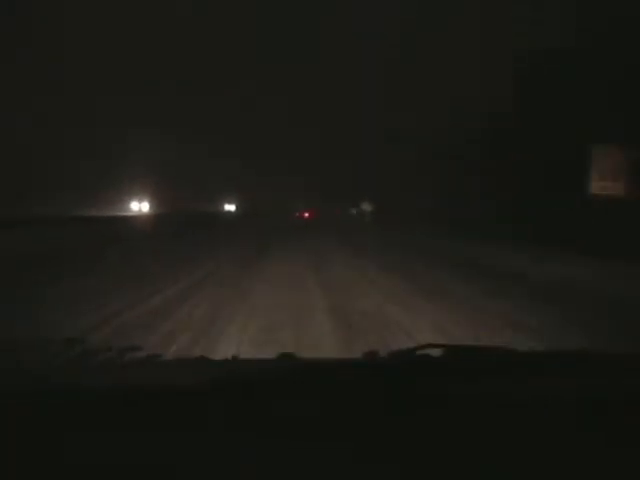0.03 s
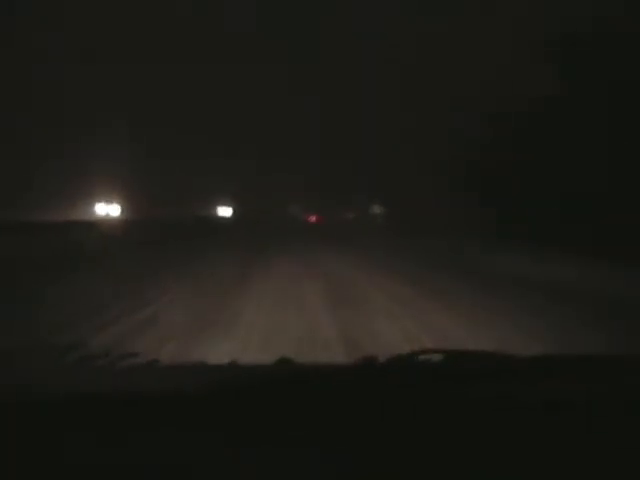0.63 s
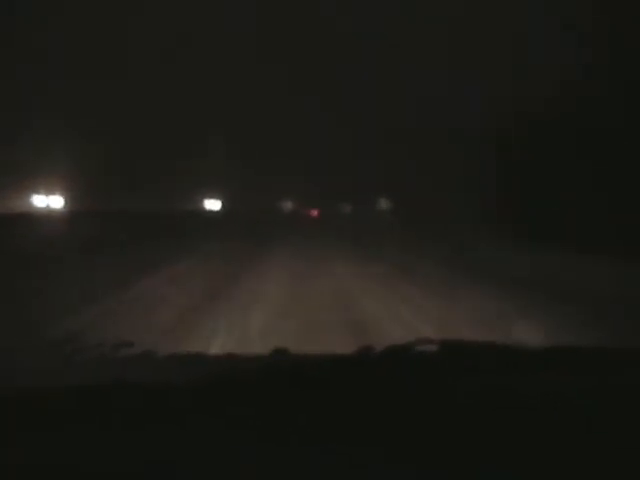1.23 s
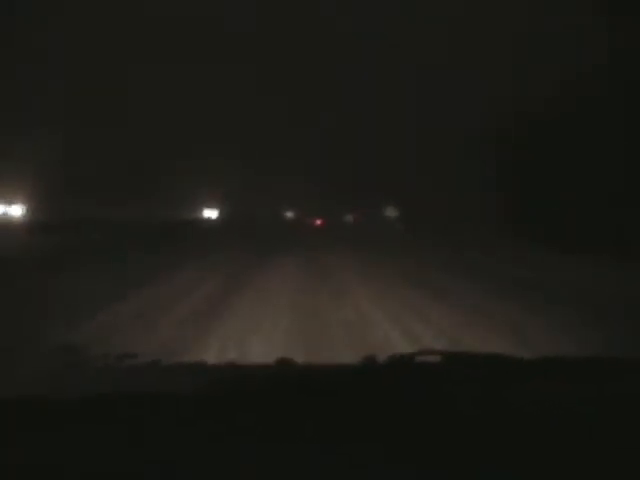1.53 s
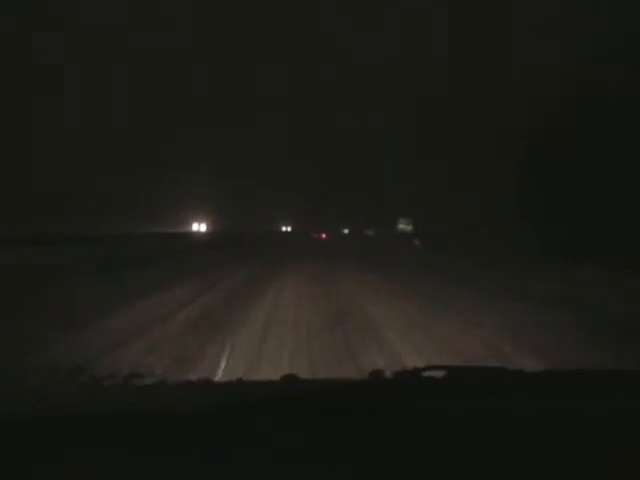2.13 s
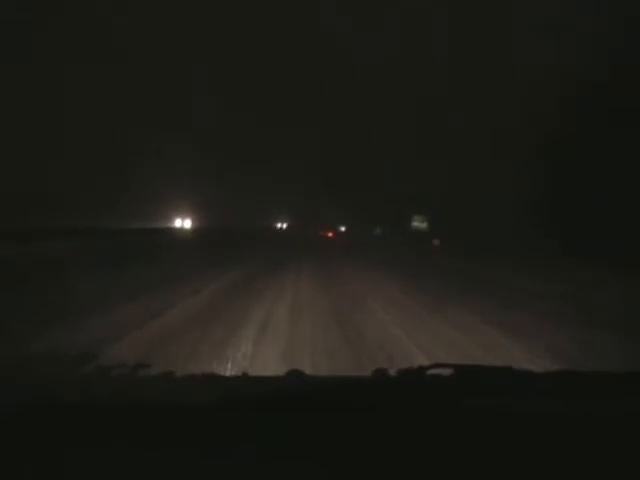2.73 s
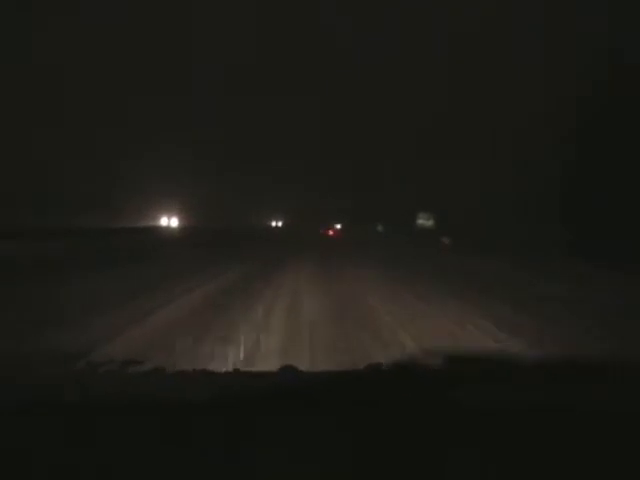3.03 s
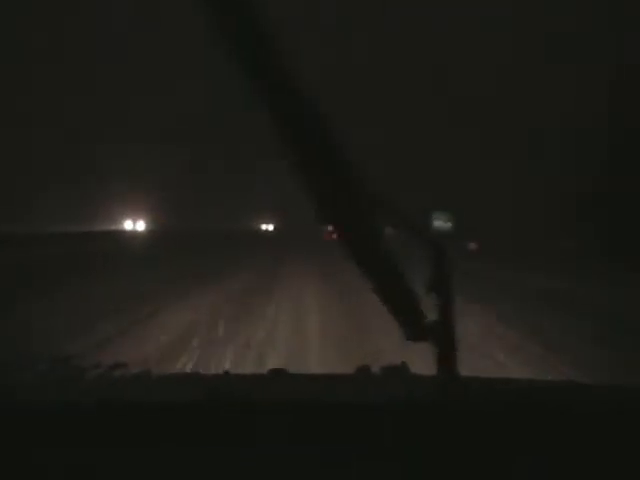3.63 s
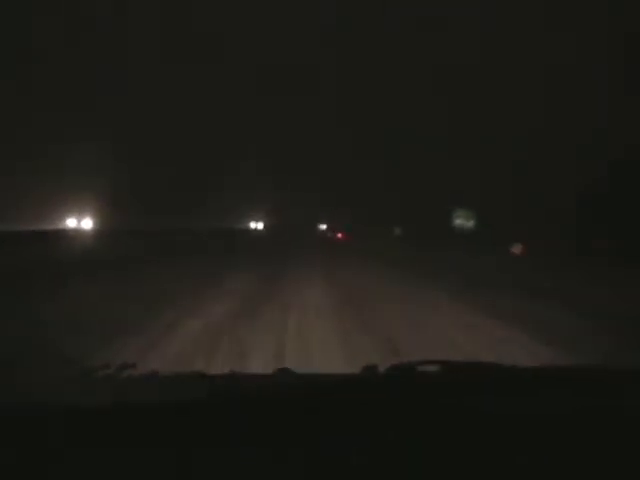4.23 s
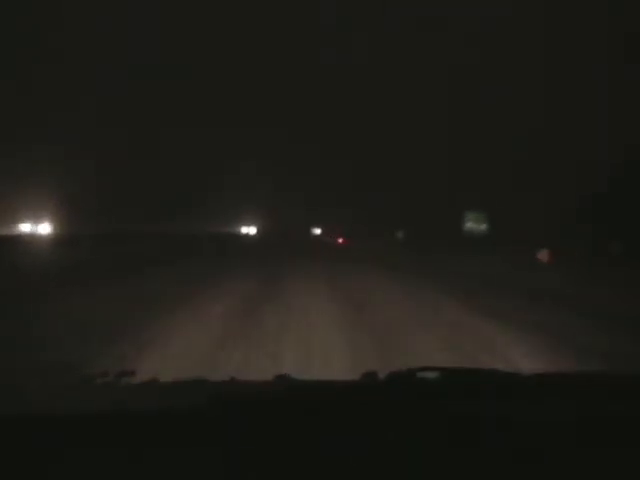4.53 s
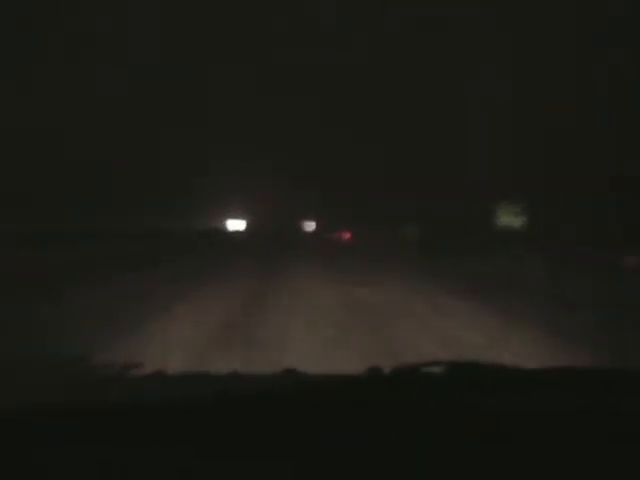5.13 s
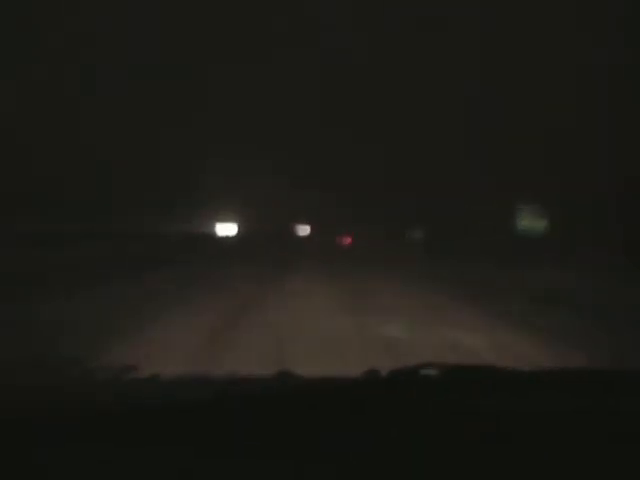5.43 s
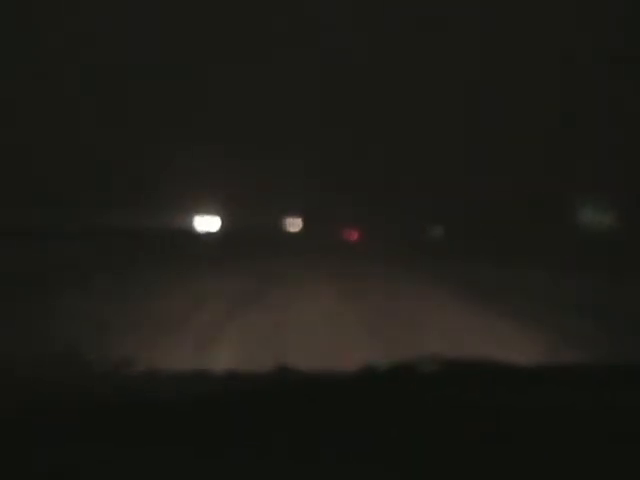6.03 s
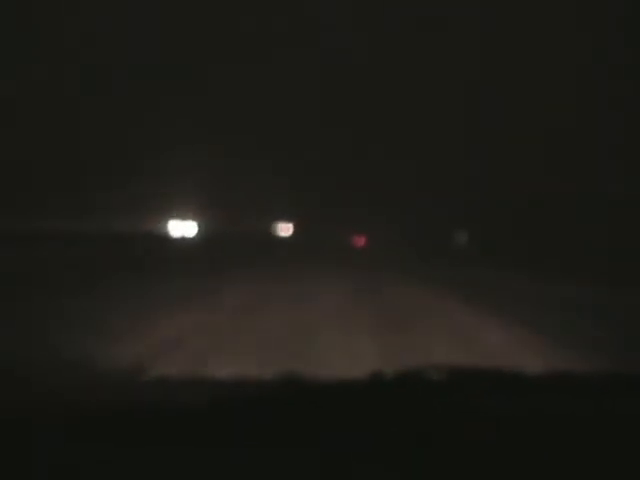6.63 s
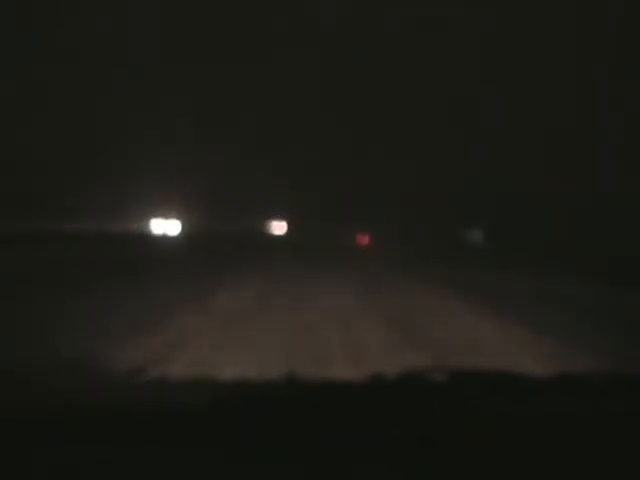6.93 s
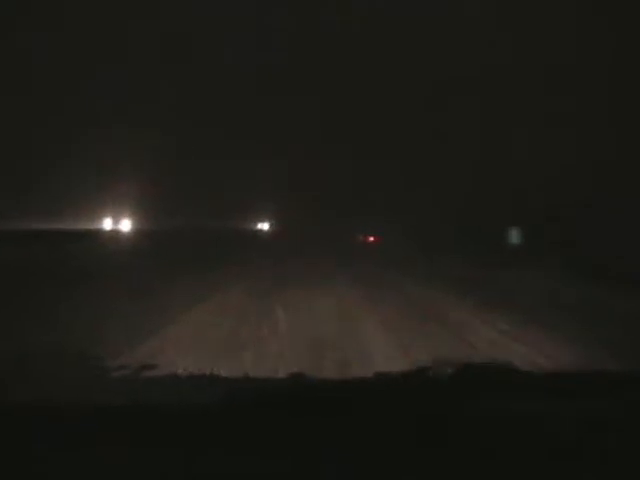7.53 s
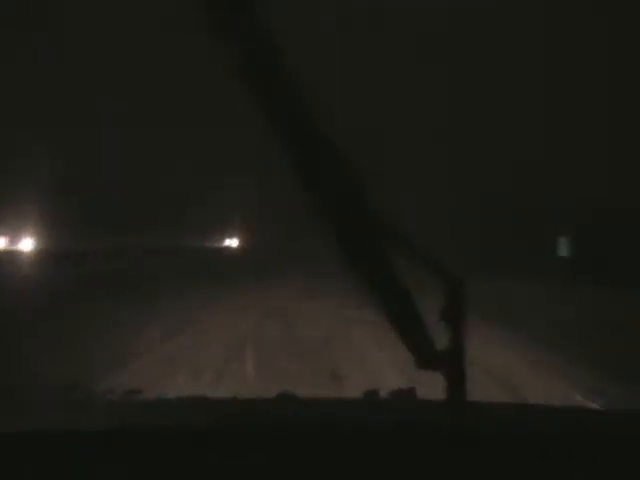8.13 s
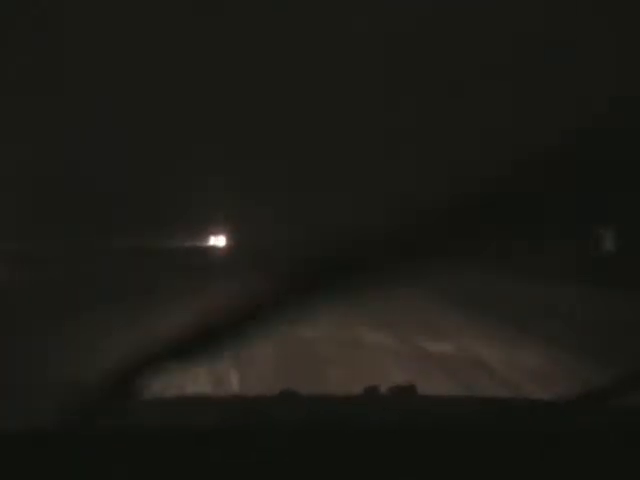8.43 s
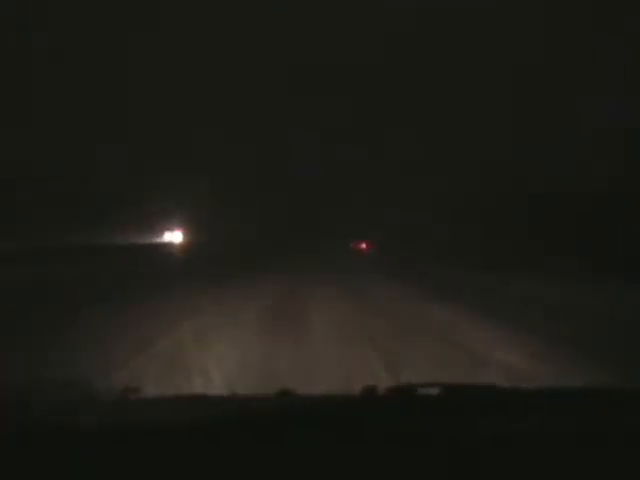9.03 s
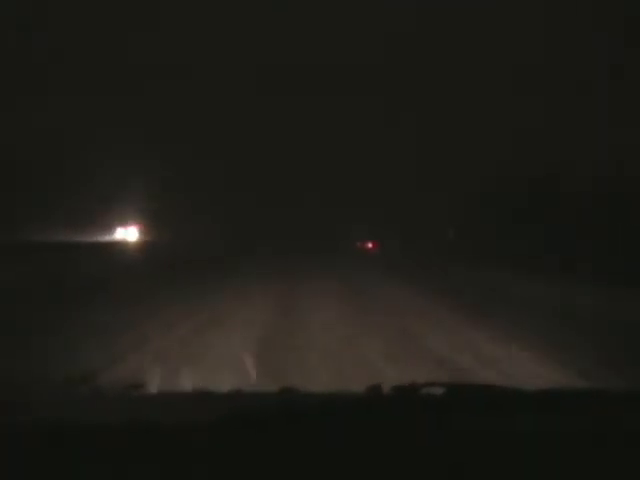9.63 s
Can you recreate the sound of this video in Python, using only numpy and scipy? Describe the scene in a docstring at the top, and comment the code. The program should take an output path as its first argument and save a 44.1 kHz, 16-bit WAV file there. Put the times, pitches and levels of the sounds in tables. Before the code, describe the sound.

Heard from within the closed cabin, a car rumbles steadily through light rain, its tyres humming and hissing and small bumps thudding through the body. Twice, about four and a half seconds apart, the windshield wipers sweep up and back. Each wipe opens with a short rubber chirp, continues with a wet swish, rasps, ticks and tiny squeaks, and ends with a knock as the arms land.

```python
"""A car rumbles through light rain at night, heard from inside, with droning tyres and hissing air.
Bumps shake the body, and spray ticks on the car now and then. Twice the wipers sweep up and back.
Their rubber chirps as it breaks loose, swishes over the wet glass, and scrapes, groans and squeaks
where it drags. At the end of each wipe the arms knock down into their rest."""
import sys
import numpy as np
from scipy import signal
from scipy.fft import rfft, irfft, next_fast_len
from scipy.io import wavfile
from scipy.ndimage import uniform_filter1d

SR = 44100
rng = np.random.default_rng(int(sys.argv[2]) if len(sys.argv) > 2 else 0)


def store_wav(level_fs):
    """Save 16-bit WAV to argv[1]."""
    pcm = np.round(np.clip(np.atleast_2d(level_fs), -1, 1) * 32767)
    wavfile.write(sys.argv[1], SR, pcm.T.astype(np.int16))


N = 431738
TIME = np.arange(N) / SR
PADDED = next_fast_len(N + 8192, True)
BIN_HZ = np.maximum(np.arange(PADDED // 2 + 1) * SR / PADDED, 1)


def from_db(db):
    """Turn decibels into a number to multiply by."""
    return 10 ** (np.asarray(db) / 20)


def rms_one(x):
    """Scale a signal so that its average power is 1."""
    return x / np.sqrt(np.mean(x ** 2) + 1e-20)


def over_time(points):
    """Join a table's points with straight lines, giving a value for every sample."""
    return np.interp(TIME, *np.transpose(points))


def over_hz(points):
    """Join a table's points along a pitch scale, giving a value for every frequency."""
    hz, value = np.transpose(points)
    return np.interp(np.log(BIN_HZ), np.log(hz), value)


def filtered(x, gain):
    """Turn each frequency up or down by its own gain."""
    return irfft(rfft(x, PADDED) * gain, PADDED)[..., :N]


def resonance(x, hz, width_hz):
    """Let through a band around one pitch, as a ringing object does."""
    decay, turn = np.exp(-np.pi * width_hz / SR), 2 * np.pi * hz / SR
    feedback = [1, -2 * decay * np.cos(turn), decay ** 2]
    return signal.lfilter((1 - decay ** 2) / 2 * np.array([1, 0, -1]), feedback, x + 1e-18)


def noise_pair():
    """Two unrelated smooth noises."""
    return rng.standard_normal((2, N))


def crackle(per_s, spread_db):
    """Two streams of tiny random clicks of uneven size, like droplets or slipping rubber."""
    sizes = from_db(spread_db * np.minimum(rng.exponential(1, N), 4))
    return rms_one((rng.random(N) < per_s / SR) * sizes * noise_pair())


def drift(per_s):
    """A random wander, typically 1 away from zero."""
    points = rng.standard_normal(int(N / SR * per_s) + 2)
    return rms_one(np.interp(TIME * per_s, np.arange(len(points)), points))


def swells(rows):
    """A loudness curve with one bell-shaped rise and fall for each row."""
    power = np.zeros(N)
    for s, half, db in rows:
        near = slice(max(int((s - 4 * half) * SR), 0), int((s + 6 * half) * SR))
        power[near] += from_db(db) ** 2 / np.cosh(2 * (TIME[near] - s) / half)
    return np.sqrt(power)


def ring(hits, tones, scatter_db=1):
    """Every hit sets all of an object's tones ringing, each with a slightly random strength."""
    at = [round(s * SR) for s, _ in hits]
    hit_db = np.array(hits)[:, 1]
    out = np.zeros(N)
    for k, (hz, tone_db, fade_s) in enumerate(tones):
        clicks = np.full(N, 1e-18)
        clicks[at] = from_db(hit_db + tone_db + scatter_db * rng.standard_normal(len(at)))
        decay, turn = from_db(-60 / (fade_s * SR)), 2 * np.pi * hz / SR
        feedback = [1, -2 * decay * np.cos(turn), decay ** 2]
        out += (-1) ** k * signal.lfilter([0, np.sin(turn)], feedback, clicks)
    return out


def reflected(x, echo_db, fade_s, lag_s=0):
    """A sound, lag_s later at the right ear, plus its quick echoes off glass and trim."""
    t = TIME[:SR // 8]
    echoes = rng.standard_normal((2, len(t))) * from_db(-60 * t / fade_s) * (t > .002)
    echoes /= np.sqrt(np.sum(echoes ** 2, axis=1, keepdims=True))
    direct = np.array([x, np.interp(TIME - lag_s, TIME, x)])
    return direct + from_db(echo_db) * signal.oaconvolve(x[None], echoes, axes=1)[:, :N]


# pitches that the cabin boosts or swallows: (frequency [Hz], width [Hz], boost [dB])
CABIN_BANDS = [(142.6, 13, 3.5), (214, 9.5, 0), (276, 18, 1.5), (379, 7.3, 1.5), (638, 28, 3.5),
               (790, 25, -2), (877, 115, 3.5), (1570, 76, -5), (1830, 64, 1.5), (2007, 120, -3),
               (2270, 120, 1), (2860, 40, -8.5)]
CABIN_DB = sum(db * np.exp(-((BIN_HZ - hz) / width) ** 2) for hz, width, db in CABIN_BANDS)
# how alike left and right sound: (frequency [Hz], likeness [0-1])
EAR_LIKENESS = [(130, .997), (290, .975), (640, .91), (1400, .78), (3100, .6), (6800, .18), (15000, .02)]

def in_cabin(pair, colour):
    """Give two noises a tone colour and the cabin's ring; the ears share the bass but not the treble."""
    gain = rms_one(from_db(over_hz(colour) + CABIN_DB))
    alike = over_hz(EAR_LIKENESS)
    shared = filtered(pair[0], gain)
    apart = filtered(pair[1], gain * np.sqrt((1 - alike) / (1 + alike)))
    return np.array([shared + apart, shared - apart])


# how strongly the road shakes the car: (time [s], level [dB])
ROAD_ROUGHNESS = [(0, -23.5), (0.7, -27.5), (1.0, -28.5), (1.35, -26.5), (2.25, -35), (3.15, -26.5),
                  (3.3, -22.5), (3.48, -29.5), (3.85, -30), (4.4, -32), (6.4, -30), (8.5, -30.5),
                  (9.79, -26)]
# tone colour of the rumble: (frequency [Hz], level [dB])
RUMBLE_COLOUR = [(12, -30), (22, -24), (32, -8.5), (52, 0.5), (80, -1.5), (105, -2), (200, -21), (800, -78)]

def road_rumble():
    """The rough road shakes the car's body into a deep noise."""
    return from_db(over_time(ROAD_ROUGHNESS)) * in_cabin(noise_pair(), RUMBLE_COLOUR)


# tone colour of the drone: (frequency [Hz], level [dB])
DRONE_COLOUR = [(20, -40), (70, -14), (110, 0), (145, -1), (190, -8), (310, -12.5), (540, -14.5),
                (740, -23), (1000, -24.5), (1450, -28.5), (2600, -33.5), (3400, -46.5), (8000, -70)]

def tyre_drone(average_db=-22.6, follow_share=0.13):
    """The rolling tyres drone, a little louder where the road is rougher."""
    road_db = over_time(ROAD_ROUGHNESS)
    drone_db = average_db + follow_share * (road_db - road_db.mean())
    return from_db(drone_db) * in_cabin(noise_pair(), DRONE_COLOUR)


# hiss as the road gets wetter or drier: (time [s], level [dB])
ROAD_WETNESS = [(0, -43.5), (2.0, -44), (2.9, -42.5), (4.7, -45), (6.1, -43.5), (7.5, -44), (9.2, -42),
                (9.79, -46)]
# tone colour of the hiss: (frequency [Hz], level [dB])
HISS_COLOUR = [(100, -22), (1500, 7), (3500, 0), (5000, -3), (7500, -7.5), (11000, -10), (14000, -14),
               (16000, -28)]

def hiss(flutter_db=0.9):
    """Rushing air and tyres on the wet road make a slightly fluttering hiss."""
    hiss_db = over_time(ROAD_WETNESS) + flutter_db * drift(per_s=25)
    return from_db(hiss_db) * in_cabin(noise_pair(), HISS_COLOUR)


# hum as the road surface changes: (time [s], level [dB])
HUM_LOUDNESS = [(0, -32.5), (1.2, -37.5), (2.3, -43.5), (3.4, -33), (4.4, -32), (5.7, -29), (6.7, -35.5),
                (8.2, -30), (9.0, -35), (9.79, -30)]
# tones of the hum: (pitch [Hz], width [Hz], relative level [dB])
HUM_TONES = [(136.3, 11.3, -2.5), (215.1, 19.6, -6.5), (271.7, 18.3, -5)]

def tyre_hum():
    """The tyres hum a few wavering tones that swell and fade with the road surface."""
    tread = rng.standard_normal(N)
    tones = np.zeros(N)
    for hz, width, db in HUM_TONES:
        tone = resonance(resonance(tread, hz, width), hz, width)
        tones += from_db(db) * rms_one(tone)
    return from_db(over_time(HUM_LOUDNESS)) * tones


# bumps in the road: (time [s], level [dB])
ROAD_BUMPS = [(0.075, -15.5), (.365, -15), (0.706, -12.5), (1.08, -16), (1.215, -15.5), (1.383, -18),
              (1.716, -16), (2.822, -11), (3.125, -10.5), (3.285, -16), (6.915, -15.5), (9.55, -17)]
# tones of the car's body: (pitch [Hz], relative level [dB], time to fade by 60 dB [s])
BODY_TONES = [(45, -7, 0.059), (136.7, 1, 0.18), (255, -6.5, 0.032)]

def bumps():
    """Each bump makes the car's body ring with a low thud."""
    return ring(ROAD_BUMPS, BODY_TONES)


# spray hitting the car: (time [s], half length [s], level [dB])
SPRAY_HITS = [(.555, .009, -43), (.622, .011, -39), (1.575, .003, -47), (7.118, .003, -39.5)]
# tone colour of the spray: (frequency [Hz], level [dB])
SPRAY_TONE_COLOUR = [(1200, -18), (2500, 4), (3600, -1), (5500, -1), (8000, -12), (11000, -7), (15000, -20)]

def spray():
    """Small bunches of droplets tick on the car."""
    return in_cabin(swells(SPRAY_HITS) * crackle(per_s=4600, spread_db=1.5), SPRAY_TONE_COLOUR)


# tone colour of a tick, from a drop or from rubber: (frequency [Hz], level [dB])
TICK_COLOUR = [(400, -14), (1500, 0), (3000, 0), (7000, -4), (12000, -9), (16000, -22)]

def ticks(rows, rise_s=.003, fade_s=.038, sharpness=8, ring_db=13):
    """Sudden bursts of crackle, each ringing at its own pitch and dying quickly."""
    grains = in_cabin(crackle(per_s=7000, spread_db=2), TICK_COLOUR)
    t = TIME[:int(fade_s * SR)]
    loudness = np.minimum(t / rise_s, 1) * from_db(-60 * np.maximum(t - rise_s, 0) / fade_s)
    out = np.zeros((2, N))
    for s, db, hz in rows:
        near = slice(int(s * SR), int(s * SR) + len(t))
        burst = grains[:, near] + from_db(ring_db) * resonance(grains[:, near], hz, hz / sharpness)
        burst = signal.lfilter(*signal.butter(2, 2.2 * hz, fs=SR), burst)   # lower ticks are duller
        out[:, near] += from_db(db) * loudness * rms_one(burst)
    return out


# a raindrop landing: (time [s], level [dB], pitch [Hz])
HEAVY_DROP = [(.651, -34, 3600)]

def raindrop():
    """One heavy drop ticks on the windscreen."""
    return ticks(HEAVY_DROP)


# when each wipe begins: (time [s])
WIPE_STARTS = [3.1, 7.598]
# spots where the rubber drags, flips over for the return, or judders as the arms slow down:
# (time into wipe [s], half length [s], shudder [dB], first wipe's rasp [dB], second's [dB], pitch [Hz])
DRAG_SPOTS = [ (0.057, 0.034, -31, -45, -43, 2030), (0.152, 0.0036, -33, -27, -34, 4500),
              (0.219, 0.012, -27, -33.5, -34, 3600), (0.253, 0.008, -28, -46, -38, 1500),
              (0.387, 0.005, -30.5, -38, -46, 1750), (0.505, 0.022, -32, -35.5, -34, 3540),
              (0.56, 0.018, -29, -44, -47, 2100), (0.683, 0.005, -31.5, -34, -38, 2220),
              (0.703, 0.013, -32, -33, -31.5, 2540), (0.731, 0.0057, -27, -39, -37, 3000),
              (0.817, 0.019, -28.5, -49, -45, 2300), (0.863, 0.014, -32, -33, -30, 3780),
              (.927, 0.0041, -50, -36, -32, 3000), (1.004, 0.011, -30, -35, -33, 4240),
              (1.051, 0.028, -32.5, -35.5, -38, 3440), (1.127, 0.0036, -32, -35, -35, 2900),
              (1.145, 0.0043, -25, -40, -32.5, 2560), (1.19, 0.0087, -29, -34.5, -31, 2300)]
# tone colour of the shaking arm: (frequency [Hz], level [dB])
SHUDDER_COLOUR = [(60, -56), (140, -2), (300, 4.5), (620, 2), (900, -9.5), (1250, -8.5), (1600, -13.5),
                  (3000, -17.5), (8000, -62)]

def arm_shudder(boost_db=4.5):
    """Slipping rubber shakes the wiper arm at the same spots in both wipes."""
    shakes = [(start + after, half, db) for start in WIPE_STARTS for after, half, db, *_ in DRAG_SPOTS]
    shaking = swells(shakes) * crackle(per_s=5400, spread_db=1.5)
    return from_db(boost_db) * in_cabin(shaking, SHUDDER_COLOUR)


# tone colour of the scraping rubber: (frequency [Hz], level [dB])
RASP_COLOUR = [(200, -22), (900, -17), (1500, 8.5), (2400, 5), (3700, -1), (5500, -3.5), (7500, -8.5),
               (10000, -15), (15000, -25)]

def rubber_rasp(chatter_db=0.5, boost_db=2):
    """At each drag spot the rubber edge grips unevenly, and its many tiny slips make it ring."""
    friction = rms_one(crackle(per_s=5000, spread_db=2) * from_db(chatter_db * drift(per_s=220)))
    rasp = np.zeros((2, N))
    for wipe, start in enumerate(WIPE_STARTS):
        for after, half, _, *rasp_db, edge_hz in DRAG_SPOTS:
            s = start + after
            near = slice(int((s - 4 * half) * SR), int((s + 6 * half) * SR))
            offset = (TIME[near] - s) / half
            # the edge bites suddenly and lets go gradually
            grip = np.where(offset < 0, np.exp(-offset ** 4 / 2), 1 / np.sqrt(np.cosh(1.8 * offset)))
            burst = from_db(rasp_db[wipe]) * grip * friction[:, near]
            rasp[:, near] += 0.74 * burst + 0.44 * resonance(burst, edge_hz, width_hz=570)
    return from_db(boost_db) * in_cabin(rasp, RASP_COLOUR)


def stick_slip(rows, overtones_db):
    """Rubber grips and lets go so fast that it makes a gliding, shaky tone."""
    out = np.zeros(N)
    for s, length, start_hz, end_hz, db, rough in rows:
        at, progress = round(s * SR), np.linspace(0, 1, int(length * SR))
        wobbles = uniform_filter1d(rng.standard_normal((2, len(progress))), size=24)
        jitter, grit = map(rms_one, wobbles)
        hz = (start_hz + (end_hz - start_hz) * progress) * (1 + rough * jitter)
        phase = 2 * np.pi * np.cumsum(hz) / SR
        overtones = sum(from_db(level) * np.sin(k * phase) for k, level in enumerate(overtones_db, 2))
        # rough slips end abruptly and unevenly: the overtones grow and smear
        tone = np.sin(phase) + overtones * rough * (30 + 18 * grit)
        out[at:at + len(tone)] += np.sqrt(2) * from_db(db) * np.sin(np.pi * progress) * tone
    return out


# chirps: (time [s], length [s], start pitch [Hz], end pitch [Hz], level [dB], roughness [0-1])
RUBBER_CHIRPS = [(3.1703, .0145, 1255, 1345, -10.6, .055), (7.6652, .0085, 930, 1230, -19, .1),
                 (7.6702, .012, 1170, 1350, -11.3, .07)]

def chirps():
    """The rubber chirps as it breaks loose at the start of a wipe."""
    tones = stick_slip(RUBBER_CHIRPS, overtones_db=[-22, -28])
    return reflected(tones, echo_db=-17, fade_s=.1, lag_s=6e-5)


# water on the glass: (time into wipe [s], length [s], first wipe's level [dB], second's [dB])
WET_PATCHES = [(.149, 0.016, -45, -43), (0.206, 0.032, -50, -50), (0.287, 0.03, -40.5, -39.5),
               (0.326, 0.11, -41, -42.5), (0.483, 0.033, -44, -43.5), (0.674, 0.074, -40.5, -45),
               (.782, .026, -38, -38), (0.832, 0.057, -40, -43.5), (0.895, 0.26, -43, -43),
               (1.23, .0054, -46.5, -51)]

def water_pushed(rise_s=0.019, thinning_db_per_s=21, fall_s=0.023):
    """The swish's loudness curve: each wet patch starts suddenly, thins under the blade and dies away."""
    power = np.zeros(N)
    for wipe, start in enumerate(WIPE_STARTS):
        for after, length, *wipe_db in WET_PATCHES:
            t = TIME - start - after
            rise = np.clip(1 + t / rise_s, 0, 1)
            thinning = from_db(wipe_db[wipe] - thinning_db_per_s * np.clip(t, 0, length))
            fall = np.exp(-np.maximum(t - length, 0) / fall_s)
            power += (rise * thinning * fall) ** 2
    return np.sqrt(power)


# tone colour of the swish: (frequency [Hz], level [dB])
SWISH_COLOUR = [(100, 8), (400, 20.5), (1200, 14), (2500, 11.5), (4000, 8.5), (7000, 2.5), (10000, -0.5),
                (13500, -4), (16000, -27)]

def swish(film_db=6.5, drops_db=-10, catches_db=2):
    """The blades push a thin film of water over the glass, and drops burst in it."""
    film = from_db(film_db + 1.6 * drift(per_s=110)) * crackle(per_s=12000, spread_db=2)
    drops = from_db(drops_db) * crackle(per_s=260, spread_db=3)
    # parts of the rubber edge catch at random, each fizzing at its own pitch
    friction = crackle(per_s=2500, spread_db=2.5)
    catches = sum(from_db(5 * drift(per_s=70)) * resonance(friction, hz, hz / 9)
                  for hz in np.geomspace(1800, 11000, num=9))
    wet_noise = film + drops + from_db(catches_db) * rms_one(catches)
    return in_cabin(water_pushed() * wet_noise, SWISH_COLOUR)


# short groans: (time [s], length [s], start pitch [Hz], end pitch [Hz], level [dB])
BLADE_GROANS = [ (3.247, 0.0066, 1780, 1700, -29), (3.2473, 0.0074, 2310, 2230, -29),
                (3.307, 0.022, 3900, 3100, -39), (3.308, 0.042, 990, 700, -29),
                (3.32, 0.03, 1450, 1250, -34), (3.481, .012, 1500, 1200, -31),
                (3.586, 0.019, 2200, 2600, -32), (3.651, 0.045, 990, 680, -29),
                (3.912, 0.015, 1300, 1100, -26), (3.929, 0.019, 1000, 700, -27),
                (3.94, 0.05, 1700, 2810, -37), (4.329, 0.007, 2700, 1700, -30),
                (4.334, .013, 564, 433, -20), (7.623, 0.04, 520, 1060, -28), (7.822, .022, 1400, 1140, -27),
                (7.955, .014, 3200, 2800, -34), (7.986, 0.0088, 990, 820, -24.5),
                (8.279, 0.02, 1250, 950, -25.5), (8.396, 0.011, 1100, 1500, -30),
                (8.41, 0.017, 1280, 1090, -26), (8.423, 0.023, 900, 540, -27),
                (8.448, 0.022, 2500, 1900, -34), (8.826, 0.011, 620, 460, -20)]

def groans(sharpness=4.9, evenness=0.55):
    """Rubbing keeps the blade singing for a moment; its pitch slides as the load on it changes."""
    out = np.zeros(N)
    friction = crackle(per_s=3000, spread_db=5)[0]
    for s, length, start_hz, end_hz, db in BLADE_GROANS:
        progress = np.linspace(0, 1, int(length * SR))
        near = slice(int(s * SR), int(s * SR) + len(progress))
        hz = start_hz * (end_hz / start_hz) ** progress
        glide = np.exp(2j * np.pi * np.cumsum(hz) / SR)
        decay = np.exp(-np.pi * start_hz / sharpness / SR)
        # keep the part of the friction that lies near the sliding pitch
        ringing = glide * signal.lfilter([1 - decay], [1, -decay], friction[near] / glide)
        evened = ringing.real / (np.abs(ringing) + 1e-9) ** evenness   # rubbing steadies the level
        arch = np.sqrt(np.abs(np.sin(np.pi * progress)))
        out[near] += from_db(db) * arch * rms_one(evened)
    return reflected(out, echo_db=-8.5, fade_s=0.028, lag_s=3e-5)


# thumps of the rods that drive the wipers: (time [s], level [dB])
ROD_THUMPS = [(3.294, -14), (3.311, -14), (3.343, -12), (3.652, -17.5), (3.678, -15), (7.857, -16),
              (7.89, -16), (8.147, -26), (8.372, -12.5), (8.398, -16)]

def thumps(muffle_hz=400):
    """The rods take up load and nudge the car's body through their soft mounts."""
    return signal.lfilter(*signal.butter(2, muffle_hz, fs=SR), ring(ROD_THUMPS, BODY_TONES))


# snaps of the rubber: (time [s], level [dB], pitch [Hz])
RUBBER_SNAPS = [ (3.3086, -31, 4200), (3.4143, -30, 2700), (3.657, -26.5, 2300), (3.801, -28, 3100),
                (3.833, -31, 3400), (3.952, -28, 1900), (3.968, -31, 3700), (4.021, -35.5, 6000),
                (4.101, -27, 5600), (4.159, -32, 5000), (4.248, -28, 2400), (4.3265, -29.5, 5500),
                (7.8215, -27.5, 5300), (7.8865, -29.5, 6500), (8.278, -20.5, 2200), (8.308, -27, 3300),
                (8.336, -31, 3700), (8.452, -30, 3900), (8.467, -29, 2000), (8.523, -29.5, 4000),
                (8.603, -27.5, 2400), (8.654, -33, 5500), (8.8245, -28, 5000)]

def snaps():
    """The rubber edge snags and snaps free with a tick."""
    return ticks(RUBBER_SNAPS)


# knocks of the wiper arms: (time [s], level [dB])
ARM_KNOCKS = [(3.311, -24), (3.659, -24), (4.3277, -17), (4.3335, -27), (7.986, -21), (8.281, -24),
              (8.826, -21), (8.8325, -28)]
# tones of arm and windscreen: (pitch [Hz], relative level [dB], time to fade by 60 dB [s])
ARM_TONES = [(250, -7, .06), (375, -4, .055), (520, -2.5, .05), (670, 0, .04), (940, -5, .025),
             (1230, -5, .022), (1620, -11, .018), (1950, -8, .02), (2500, -8, .02)]

def knocks():
    """The arms knock in their loose joints, then land in their rest with one bounce."""
    return reflected(ring(ARM_KNOCKS, ARM_TONES), echo_db=-10, fade_s=.06)


# squeaks: (time [s], length [s], start pitch [Hz], end pitch [Hz], level [dB], roughness [0-1])
RUBBER_SQUEAKS = [(3.592, .012, 3700, 4100, -32.5, .08), (8.093, .036, 3800, 3540, -29.5, .055),
                  (8.117, .037, 3380, 2920, -30.5, .055)]

def squeaks():
    """The rubber sticks and slips with a high squeak near the far end of the sweep."""
    return reflected(stick_slip(RUBBER_SQUEAKS, overtones_db=[-18]), echo_db=-7, fade_s=.05)


# squirts of water: (time [s], half length [s], level [dB])
WATER_SQUIRTS = [(3.888, 0.012, -39.5), (8.398, 0.013, -39)]
# tone colour of a squirt: (frequency [Hz], level [dB])
FIZZ_COLOUR = [(2000, -20), (5000, -2), (9500, 0), (12500, -3), (15000, -20)]

def squirts():
    """Fine droplets fizz out from under the blade as it picks up speed."""
    return in_cabin(swells(WATER_SQUIRTS) * crackle(per_s=6000, spread_db=1.5), FIZZ_COLOUR)


def scene():
    """The rainy drive with both wipes on top."""
    drive = road_rumble() + tyre_drone() + hiss() + tyre_hum() + bumps() + spray() + raindrop()
    wipers = arm_shudder() + rubber_rasp() + chirps() + swish() + groans()
    wipers += thumps() + snaps() + knocks() + squeaks() + squirts()
    return drive + wipers


# how much louder the left microphone is than the right: (frequency [Hz], level [dB])
LEFT_OVER_RIGHT = [(60, 1.8), (120, 1.5), (700, 1.6), (1300, .7), (2400, 0), (9000, -.8)]

def record(dry, left_lead_s=2.5e-5, cutoff_hz=14700):
    """Two microphones: the left hears a little earlier and gets more bass; the highest treble is cut."""
    sides = np.array([[.5], [-.5]])
    balance = from_db(over_hz(LEFT_OVER_RIGHT) * sides)
    time_shift = np.exp(2j * np.pi * BIN_HZ * left_lead_s * sides)
    treble_cut = 1 / np.sqrt(1 + (BIN_HZ / cutoff_hz) ** 160)
    return filtered(dry, balance * time_shift * treble_cut)


dry = scene()
out = record(dry)
store_wav(out)
```